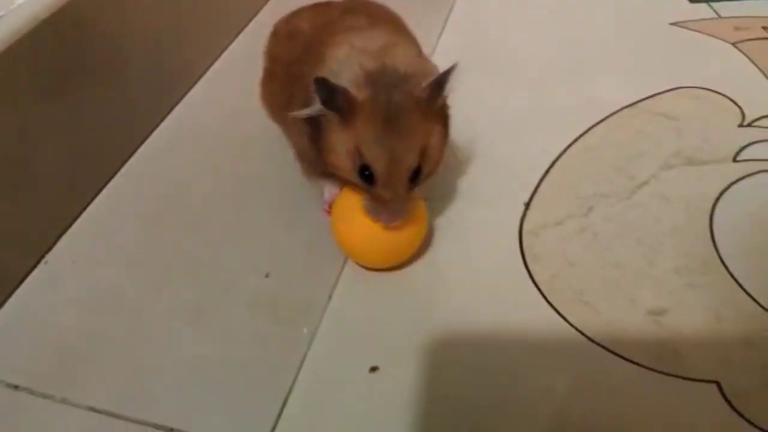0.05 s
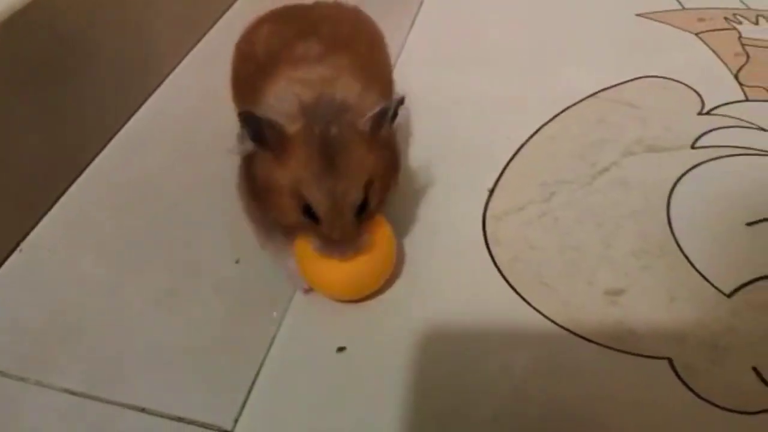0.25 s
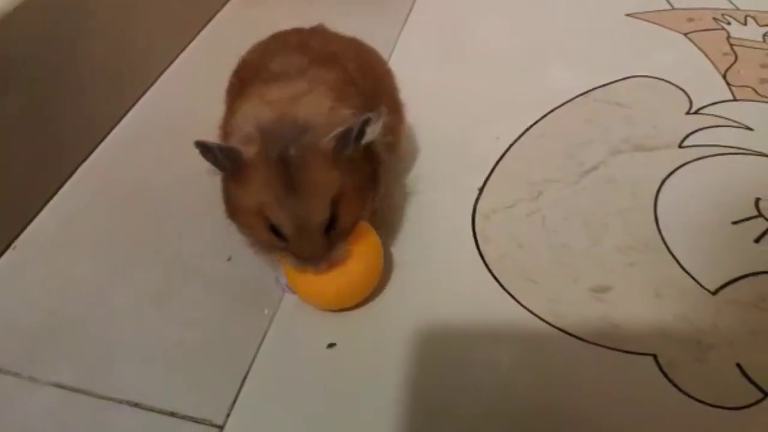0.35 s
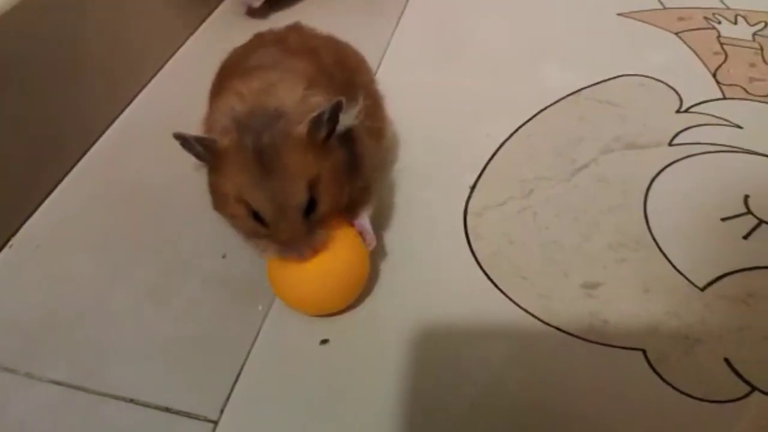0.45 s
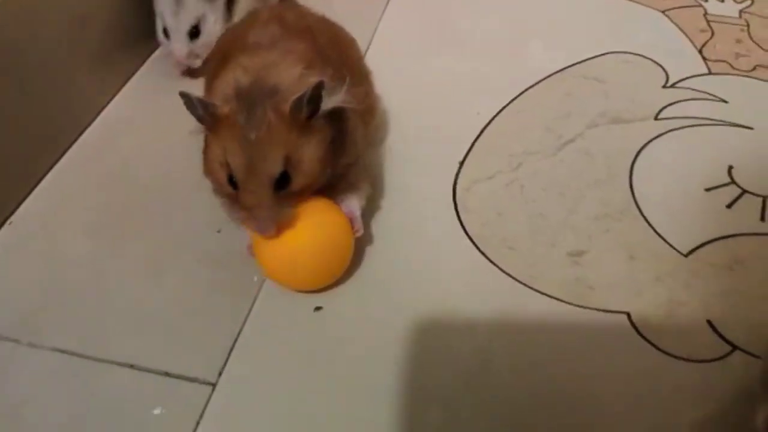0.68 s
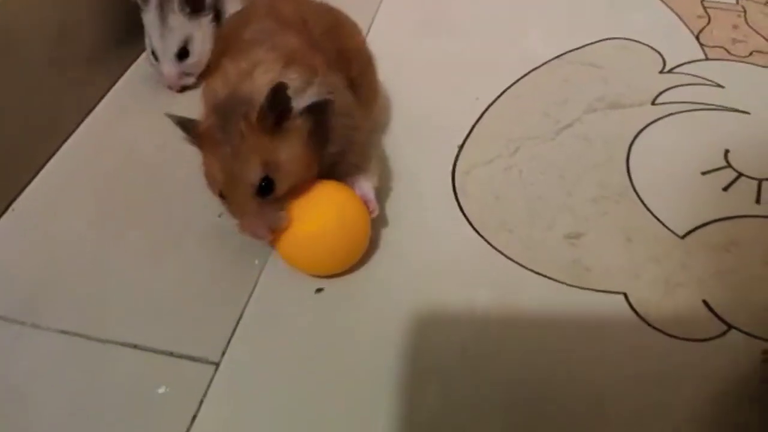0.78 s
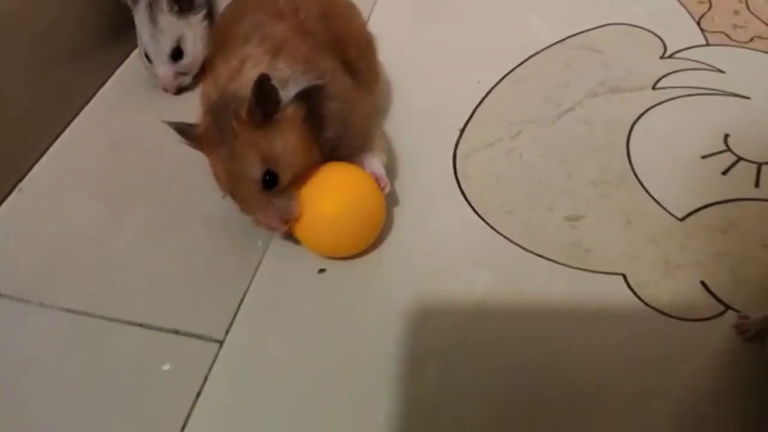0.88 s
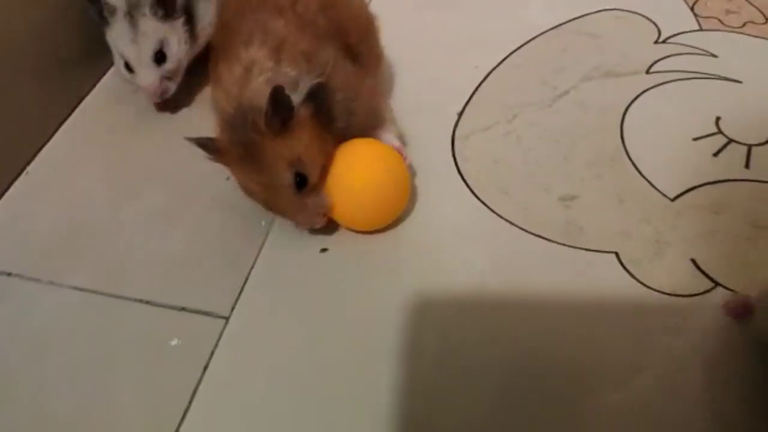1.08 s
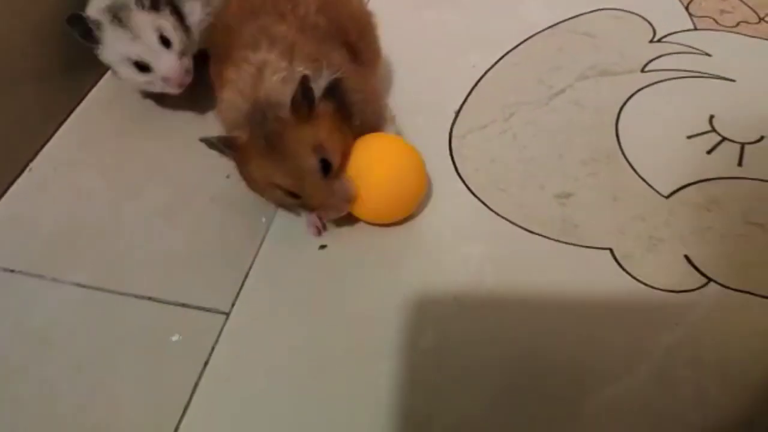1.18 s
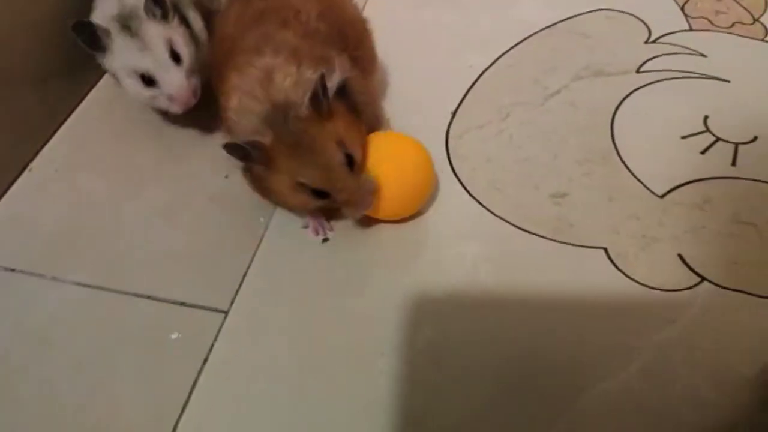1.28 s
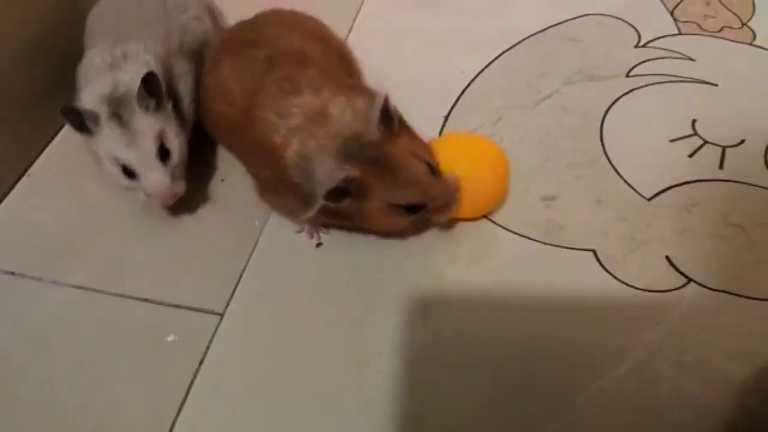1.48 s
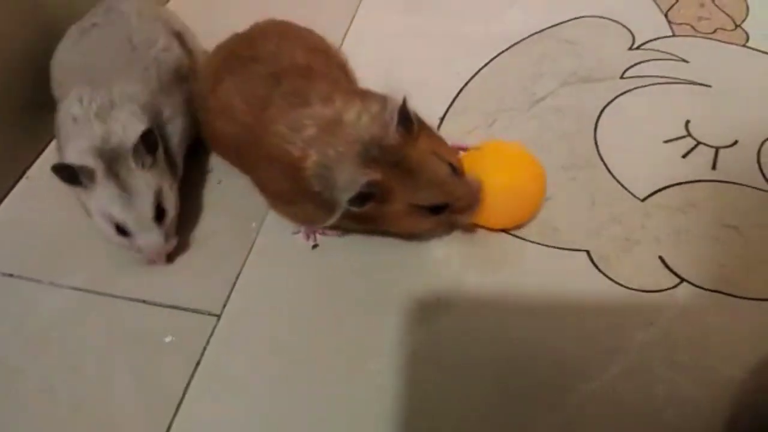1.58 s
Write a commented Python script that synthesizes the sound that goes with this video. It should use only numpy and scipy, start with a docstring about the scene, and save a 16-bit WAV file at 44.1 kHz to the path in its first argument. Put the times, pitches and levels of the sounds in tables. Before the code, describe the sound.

A light plastic ball clicks and taps as a hamster nudges it over tile, close by in a small room. Faint scuffs, paw pats and fur rustle fill the first 0.3 seconds. The sharpest click lands with a soft bump near 0.5 seconds, another near 0.8. Smaller clicks cluster from 1.1 to 1.5 seconds, ending with a light knock further off, over faint rumble and hiss.

```python
"""Hamster with a plastic ball.

A small tiled room, a stereo pair close to the floor, the right microphone the brighter one. A hamster
noses a light ball along: teeth and claws click on the shell, the ball bumps and rolls, paws pat and fur
brushes past. Something knocks further off, and a faint rumble and hiss lie underneath."""
import sys
import numpy as np
from scipy import signal
from scipy.fft import rfft, irfft, next_fast_len
from scipy.io import wavfile
from scipy.ndimage import uniform_filter1d

SR = 44100
rng = np.random.default_rng(int(sys.argv[2]) if len(sys.argv) > 2 else 0)


def put_to_file(sound):
    """Save the sound as 16-bit audio at rate SR, in the file named by the first command-line argument."""
    columns = np.atleast_2d(sound).T  # one column per channel
    safe = np.clip(columns, -1, 1)
    whole_steps = np.round(safe * 32767)
    wavfile.write(sys.argv[1], SR, whole_steps.astype(np.int16))


N = 72765
TIME = np.arange(N) / SR
TAP_SAMPLES = 44  # a tap at 0 dB holds the energy of 1 ms at full scale


def from_db(db):
    """Decibels to gain."""
    return 10 ** (np.asarray(db) / 20)


def unit(x, size=N):
    """Scale to the energy of `size` samples of height 1."""
    return x * np.sqrt(size / (np.sum(x ** 2, axis=-1, keepdims=True) + 1e-20))


def colour(x, points):
    """Causal (minimum-phase) filter that follows a curve of (f/Hz, level/dB) points."""
    size = next_fast_len(N + 8192)
    hz, db = np.transpose(points)
    bin_hz = np.arange(size // 2 + 1) * SR / size
    gain = from_db(np.interp(np.log(bin_hz + 1), np.log(hz), db))
    cepstrum = irfft(np.log(gain), size)
    cepstrum[1:size // 2] *= 2
    cepstrum[size // 2 + 1:] = 0
    return irfft(rfft(x, size) * np.exp(rfft(cepstrum)), size)[..., :N]


def passband(x, hz, kind):
    """Gentle low-, high- or band-pass filter."""
    return signal.sosfilt(signal.butter(2, hz, kind, fs=SR, output="sos"), x + 1e-18)


def band(x, hz, octaves):
    """Band-pass reaching some octaves to each side of a centre."""
    return passband(x, [hz / 2 ** octaves, min(hz * 2 ** octaves, .47 * SR)], "band")


def swell(s, half_s):
    """Bell-shaped envelope centred on time s."""
    return np.exp(-np.minimum(((TIME - s) / half_s) ** 2, 60))


def impulse(s):
    """One sharp contact at time s."""
    return 1. * (np.arange(N) == int(s * SR))


def grit(grain_db):
    """Friction noise: countless tiny contacts of uneven size."""
    return rng.standard_normal(N) * from_db(grain_db * np.minimum(rng.exponential(1, N), 5))


def reverberation(t60, build_s=0.0006, smooth_hz=160):
    """Half a second of dying noise, its spectrum evened out so that no pitch stands out."""
    t = TIME[:SR // 2]
    noise = rng.standard_normal(len(t)) * from_db(-60 * t / t60) * (1 - np.exp(-t / build_s))
    spectrum = rfft(noise, 2 * len(t))
    power = uniform_filter1d(np.abs(spectrum) ** 2, size=int(2 * len(t) * smooth_hz / SR))
    return irfft(spectrum * np.sqrt(power.mean() / power))[:len(t)]


def room(direct, scattered, left_lag_s=0, left_echoes=(), treble_hz=7640):
    """Near surfaces echo the direct sound; the scattered part feeds a tail whose treble dies first."""
    left, right = [*left_echoes, (.0150, -14)], [(.0092, -9)]  # echoes: delay/s, level/dB
    sides = []
    for lag, echoes in ((left_lag_s, left), (0, right)):
        early = impulse(lag) + sum(from_db(db) * impulse(lag + s) for s, db in echoes)
        tail = passband(reverberation(t60=0.17), treble_hz, "low")
        tail += passband(reverberation(t60=0.099), treble_hz, "high")
        tail += from_db(-15.5) * reverberation(t60=0.32)
        near = signal.fftconvolve(direct, unit(early[:len(tail)], size=1))
        sides.append(near + signal.fftconvolve(scattered, unit(tail, size=1)))
    return np.array(sides)[:, :N]


def background():
    """Room tone: a rumble common to both microphones under a faint, wide hiss."""
    # spectra of the rumble and the hiss: f/Hz, relative level/dB
    rumble_spectrum = [(20, -53), (32, -49), (42, -1), (62, -4.5), (110, 3.5), (160, -4), (210, -7),
                       (300, -28.5), (600, -21), (2000, -69.5)]
    hiss_spectrum = [(30, -10), (90, -25), (300, 8), (600, 4), (1200, 3.5), (2000, 1.5), (3500, -6.5),
                     (6000, -11), (10000, -13), (16000, -0.5)]
    rumble = unit(colour(rng.standard_normal(N), rumble_spectrum))
    hiss = unit(colour(rng.standard_normal((2, N)), hiss_spectrum))
    return from_db(-55.5) * rumble + from_db(-57.5) * hiss


def distant_knocks():
    """Damped mid-range taps further off; a narrow one rings briefly."""
    # knocks: t/s, level/dB, centre f/Hz, half width/octaves
    taps = [(0.608, -41.5, 1920, 0.16), (0.6931, -42, 1260, 0.63), (0.724, -43, 1500, 0.33),
            (0.872, -40.5, 1450, 0.43), (1.151, -43.5, 1440, 0.56), (1.5296, -27.5, 1550, 0.56),
            (1.539, -32, 1560, 0.48)]
    return sum(from_db(db) * unit(band(impulse(s), hz, width), TAP_SAMPLES) for s, db, hz, width in taps)


def fur_brushes():
    """Fur and paws brush past: fine, bright friction that swells and fades with each movement."""
    # movements: middle t/s, half length/s, level/dB
    strokes = [(-0.006, 0.03, -50), (0.088, 0.015, -53), (0.14, 0.02, -56), (0.181, 0.024, -55),
               (0.225, 0.0024, -45.5), (0.25, 0.024, -35), (0.314, 0.021, -49.5), (0.731, 0.038, -57.5),
               (0.838, 0.016, -58.5), (1.173, 0.017, -49), (1.243, 0.028, -58), (1.497, 0.018, -48),
               (1.578, 0.028, -41.5)]
    # spectrum of rubbing fur: f/Hz, relative level/dB
    fur_spectrum = [(1000, -1.5), (3800, -11), (6500, -5), (9000, 2), (12000, 2.5), (14500, 17.5),
                    (16000, 1.5)]
    envelope = sum(from_db(db) * swell(s, half) for s, half, db in strokes)
    return envelope * unit(colour(grit(grain_db=-1.5), fur_spectrum))


def tile_pats():
    """Paws and ball pat the tile: short, hollow and low."""
    # pats: t/s, level/dB, centre f/Hz
    pats = [(.026, -38, 338), (.053, -31.5, 413), (.210, -39.5, 376), (0.23, -40, 295), (.296, -41.5, 600),
            (0.693, -40.5, 346), (.894, -44, 398), (1.365, -37.5, 500)]
    return sum(from_db(db) * unit(band(impulse(s), hz, octaves=0.69), TAP_SAMPLES) for s, db, hz in pats)


def ball_rolls():
    """The shell grinds briefly over the tile after a nudge; a narrow rub almost sings."""
    # rolls and scuffs: middle t/s, half length/s, level/dB, centre f/Hz, half width/octaves
    scuffs = [(0.009, 0.013, -47.5, 524, 1.35), (0.005, 0.0078, -45.5, 1420, 1.28),
              (0.023, 0.0028, -44.5, 1580, 0.15), (0.068, 0.012, -54, 644, 0.87),
              (0.104, 0.021, -53, 1360, 0.64), (0.161, 0.021, -52.5, 694, 0.25),
              (0.166, 0.036, -54, 1530, 0.55), (0.17, 0.03, -53.5, 1125, 0.086),
              (0.261, 0.047, -56, 1110, 1.1), (0.734, 0.011, -53.5, 387, 0.79),
              (0.78, 0.019, -48, 694, 1.42), (0.844, 0.021, -57, 1440, 0.65),
              (1.038, 0.01, -53.5, 850, 1.12), (1.228, 0.022, -52.5, 950, 0.84),
              (1.48, 0.012, -53, 1420, 0.64)]
    return sum(from_db(db) * swell(s, half) * unit(band(grit(grain_db=6.0), hz, width))
               for s, half, db, hz, width in scuffs)


def floor_thuds():
    """Soft bumps ring low modes and the room's bass; each microphone gets its own dull tail."""
    # bumps on the floor: t/s, level/dB, upper edge f/Hz (higher for a harder contact)
    bumps = [(0.049, -37, 500), (0.172, -43.5, 304), (0.29, -31.5, 213), (0.4660, -23, 262),
             (0.662, -40, 315), (0.771, -38.5, 285), (1.042, -41.5, 207), (1.176, -42.5, 242),
             (1.357, -36, 330), (1.419, -46.5, 240), (1.490, -43.5, 212)]
    # low resonances of a bump: f/Hz, level/dB, t60/s
    low_modes = [(97.3, -4, 0.076), (132.5, -7, 0.1), (195, -6, 0.14), (281.3, -11, 0.27),
                 (379.3, -11.5, 0.256), (603, 0, 0.027)]
    pushes = sum(from_db(db) * passband(impulse(s), hz, "low") for s, db, hz in bumps)
    t = TIME[:SR // 2]
    body = sum(from_db(db - 60 * t / t60) * np.cos(2 * np.pi * hz * t) for hz, db, t60 in low_modes)
    tails = unit(band(rng.standard_normal((2, len(t))), hz=330, octaves=1.0), size=len(t))
    tails *= from_db(-13.5 - 60 * t / 0.25)
    boom = unit(band(rng.standard_normal(len(t)), hz=137, octaves=0.97), size=len(t))
    boom *= from_db(-10.5 - 60 * t / 0.33)
    return np.array([signal.fftconvolve(pushes, body + boom + tail)[:N] for tail in tails])


def shell_contact(s, bass_lag_s=.0004, on_time_hz=8000):
    """A contact at time s, smeared by the thin shell so that the bass trails the treble."""
    hz = np.arange(N // 2 + 1) * SR / N
    phase_delay = s + bass_lag_s * (1 - hz / (2 * on_time_hz))
    return irfft(np.exp(-2j * np.pi * hz * phase_delay), N)


def shell_clicks():
    """A tooth or claw slips off the ball: tick, clack and ring. Gives direct and scattered sound."""
    # slips: t/s, tick level/dB, tick f/Hz, clack level/dB, ring level/dB, room share/dB
    slips = [(0.0279, -51, 8500, -48.5, -68, 4), (0.0495, -36, 10400, -47.5, -33.5, -2),
             (0.1381, -58, 12500, -53.5, -66, 6.5), (0.3552, -60, 13500, -53.5, -50.5, 0),
             (0.4652, -13, 7840, -25.5, -15.5, -3), (0.6696, -46.5, 13900, -60, -59, 1),
             (0.7075, -42, 14000, -64, -81, -1), (0.7704, -23.5, 11900, -37, -55, 1),
             (0.8714, -55, 11400, -56.5, -60, -3), (1.0413, -55.5, 10200, -60, -76, 3),
             (1.1178, -37.5, 11800, -53, -57, 0.5), (1.3573, -30.5, 7500, -37, -59, -3.5),
             (1.413, -37.5, 8300, -46.5, -56, -2), (1.4959, -38.5, 8040, -49, -52, -5),
             (1.5284, -42, 9800, -49, -53, 2.5)]
    # spectrum of the broad clack: f/Hz, relative level/dB
    clack_spectrum = [(60, 7), (200, -3.5), (500, 4.5), (1000, 2), (1700, 1), (2400, 2.5), (3100, -3),
                      (3700, -8), (4900, -14.5), (8000, -11), (16000, 7.5)]
    # brief resonances of the thin shell: f/Hz, relative level/dB, t60/s
    shell_modes = [(1710, -1, 0.021), (2440, -4, 0.014), (3090, -0.5, 0.019), (4720, 12, 0.006),
                   (5630, 16.5, 0.0022), (6830, 9.5, 0.0033)]
    t = TIME[:SR // 20]
    bin_hz = np.arange(1, len(t) // 2 + 1) * SR / len(t)
    clack = from_db(27.5) * colour(impulse(0), clack_spectrum)[:len(t)]
    ring = sum((-1) ** k * from_db(db - 60 * t / t60) * np.sin(2 * np.pi * hz * t)
               for k, (hz, db, t60) in enumerate(shell_modes))
    ring = unit(ring, TAP_SAMPLES)
    direct, scattered = np.zeros((2, N))
    for s, tick_db, tick_hz, clack_db, ring_db, room_db in slips:
        resonator = signal.iirpeak(tick_hz, Q=3.37, fs=SR)
        tick = unit(signal.lfilter(*resonator, impulse(0)[:len(t)] + 1e-18), TAP_SAMPLES)
        parts = ((tick_db, tick), (clack_db, clack), (ring_db, ring))
        power = sum(np.abs(from_db(db) * rfft(part)[1:]) ** 2 for db, part in parts)
        click = colour(shell_contact(s), np.transpose([bin_hz, 10 * np.log10(power)]))
        direct += click
        scattered += from_db(room_db) * click
    return direct, scattered


def scene():
    """All sounds in the room; the clicks come from the right and reach the left microphone later."""
    # a click's glance off the tile into the left microphone: delay/s, level/dB
    tile_echo = [(.0009, 0)]
    rustle = fur_brushes() + ball_rolls()
    mix = room(*shell_clicks(), left_lag_s=.0005, left_echoes=tile_echo)
    for source, room_db in ((rustle, -0.5), (distant_knocks(), 2), (tile_pats(), 1)):
        mix += room(source, from_db(room_db) * source)
    return mix + floor_thuds() + background()


def record(dry):
    """Each microphone adds its colour, the deepest bass is lost, peaks are rounded and the top is cut."""
    # microphone responses: f/Hz, level/dB
    left_mic = [(300, 1), (700, -2), (1500, -7), (4000, 0), (6200, 0.5), (9000, -4.5), (11000, -10.5),
                (14500, -13)]
    right_mic = [(300, 1), (700, -2), (1500, -8.5), (4000, -1), (6200, -5.5), (9000, 6), (10700, 8.5),
                 (14000, -1.5), (15500, -10)]
    heard = np.array([colour(dry[0], left_mic), colour(dry[1], right_mic)])
    heard = passband(heard, hz=35, kind="high")
    heard = .8 * np.tanh(heard / .8)
    top_cut = signal.ellip(8, .2, 70, 16300, fs=SR, output="sos")
    return signal.sosfilt(top_cut, heard)


dry = scene()
out = record(dry)
put_to_file(out)
```